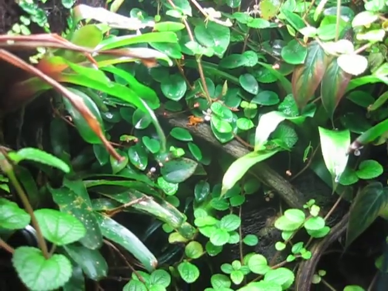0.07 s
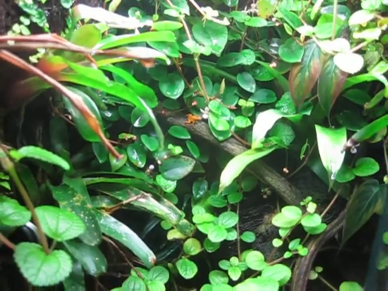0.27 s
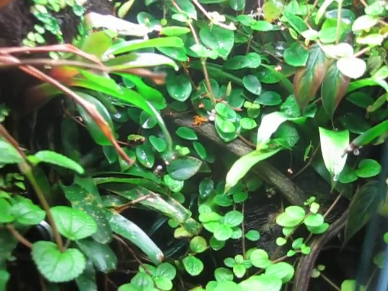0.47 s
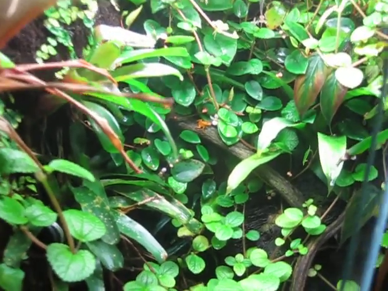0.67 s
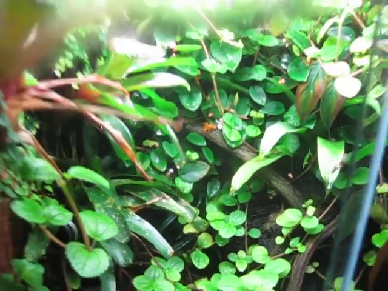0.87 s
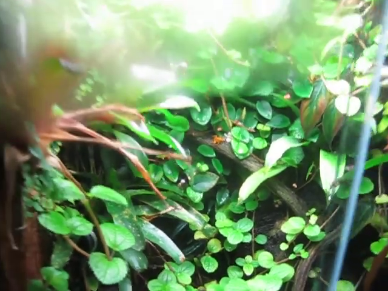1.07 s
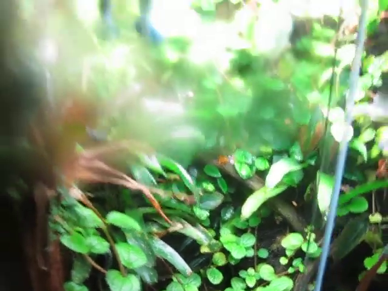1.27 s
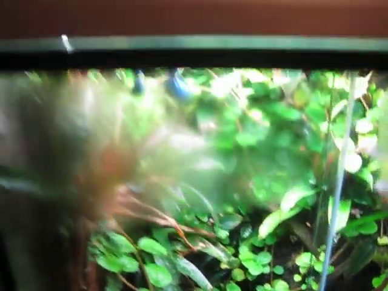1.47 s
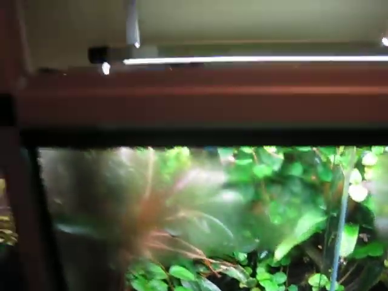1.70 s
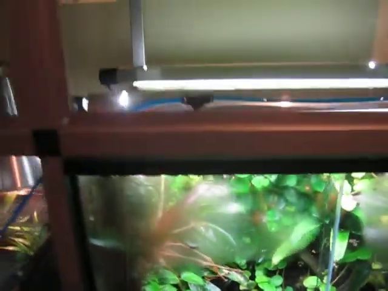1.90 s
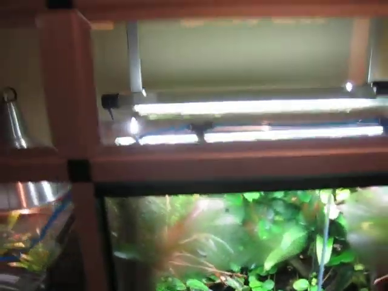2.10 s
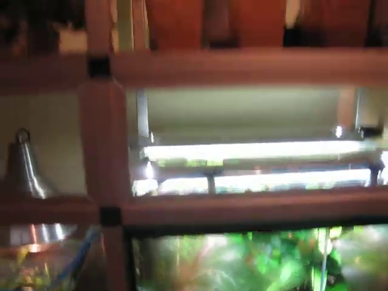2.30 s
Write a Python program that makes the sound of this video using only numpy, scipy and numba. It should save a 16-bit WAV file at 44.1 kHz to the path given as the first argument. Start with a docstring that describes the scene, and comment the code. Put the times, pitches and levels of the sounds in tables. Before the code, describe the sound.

A single sharp plastic snap up close, then quiet fan hum and faint handling.

```python
"""Camera catch snapping shut

A small plastic catch on a hand-held camera is touched, drags and snaps home, right at the microphone.
The gain control ducks, then lets the fan noise, hum and hiss of a terrarium room creep back.
A soft bump, dull nudges, a few ticks and finger rubs follow as the camera is moved."""
import sys
import numpy as np
from scipy import signal
from scipy.fft import rfft, irfft
from scipy.io import wavfile
from numba import njit

SR = 44100
rng = np.random.default_rng(int(sys.argv[2]) if len(sys.argv) > 2 else 0)


def output_pcm(signal):
    """Save a mono or channel-first signal as 16-bit PCM at the path in sys.argv[1].

    Samples are clipped to [-1, 1] before scaling.
    """
    pcm = np.clip(np.atleast_2d(signal).T, -1, 1) * 32767
    wavfile.write(sys.argv[1], SR, np.round(pcm).astype(np.int16))


N = 108045
TIME_S = np.arange(N) / SR
FREQ_HZ = np.fft.rfftfreq(N, 1 / SR)


def undb(db):
    """Decibels to gain."""
    return 10 ** (np.asarray(db) / 20)


def unit_rms(x):
    """Scale to rms 1."""
    return x / np.sqrt(np.mean(x ** 2))


def colour(x, spectrum):
    """Filter x by (freq_hz, level_db) points; rms 1."""
    hz, db = np.array(spectrum).T
    gain = undb(np.interp(np.log(np.maximum(FREQ_HZ, 1)), np.log(hz), db))
    return unit_rms(irfft(rfft(x) * gain, N))


def noise(spectrum):
    """Coloured noise; rms 1."""
    return colour(rng.standard_normal(N), spectrum)


def band(centre_hz, width_hz):
    """Noise in one resonance; rms 1."""
    detuning = 2 * (FREQ_HZ - centre_hz) / width_hz
    return unit_rms(irfft(rfft(rng.standard_normal(N)) / (1 + detuning ** 2), N))


def decay(start_s, t60_s):
    """Sudden onset, exponential decay."""
    age_s = TIME_S - start_s
    return (age_s >= 0) * np.exp(-np.log(1000) * np.maximum(age_s, 0) / t60_s)


def swell(peak_s, half_width_s):
    """Gaussian envelope."""
    return np.exp(-((TIME_S - peak_s) / half_width_s) ** 2)


def ring(start_s, modes):
    """Struck modes; neighbours swing in opposite directions."""
    age_s = TIME_S - start_s
    return sum((-1) ** k * undb(db) * decay(start_s, t60_s) * np.sin(2 * np.pi * hz * age_s)
               for k, (hz, db, t60_s) in enumerate(modes))


# Catch and camera shell modes: pitch_hz, level_db, t60_s
CATCH_MODES = [(4730, -5.5, 0.01), (5160, -7.5, 0.013), (5820, -10.5, 0.01), (7120, -10.5, .006),
               (8770, -6, 0.0056), (9720, -7, .006), (11240, -5, 0.0064), (13550, -2, .006),
               (14360, -3, .005), (15300, -4, .005)]
SHELL_MODES = [(495, -18, .03), (720, -30.5, .055), (940, -23.5, 0.043), (1140, -20.5, .03),
               (1360, -20.5, 0.029), (1566, -7.5, 0.016), (1876, -1, 0.016), (2270, -1, 0.018),
               (2374, -22, 0.056), (2620, -19.5, 0.036), (3030, -7.5, 0.02), (3210, -15, 0.018),
               (4250, -32, .06), (8460, -40.5, .06), (9690, -45.5, .065)]
# Spectra of plastic contact and room reflections: freq_hz, level_db
PLASTIC_SPECTRUM = [(150, -20), (500, -10.5), (1100, 1), (2000, 2), (3200, -1.5), (5500, -4), (8500, -3),
                    (12000, -11), (16000, -10)]
REFLECTION_SPECTRUM = [(200, -10.5), (700, 3.5), (2500, -1), (4000, -3), (5500, -19), (8500, -17),
                       (11000, -28), (16000, -30)]

def snap(start_s, shell_lag_s=0.00019, shell_attack_s=0.0007):
    """The catch cracks home, the shell rings just after, near surfaces answer briefly."""
    catch = undb(2) * ring(start_s, CATCH_MODES)
    crack = undb(-8.5) * decay(start_s, t60_s=0.0095) * noise(PLASTIC_SPECTRUM)
    shell_start_s = start_s + shell_lag_s
    shell_onset = np.clip((TIME_S - shell_start_s) / shell_attack_s, 0, 1)
    shell = undb(3) * shell_onset * ring(shell_start_s, SHELL_MODES)
    reflections = undb(-25) * decay(start_s, t60_s=0.073) * noise(REFLECTION_SPECTRUM)
    return catch + crack + shell + reflections


def drag(start_s, peak_s, end_s, slips_per_s=6000, rise_db=35.5, fall_db=3.5):
    """Stick-slip clicks and smooth friction grow louder as the catch slides towards its edge."""
    slips = unit_rms(rng.standard_normal(N) * (rng.random(N) < slips_per_s / SR))
    friction = 0.67 * rng.standard_normal(N)
    before_peak = np.maximum((peak_s - TIME_S) / (peak_s - start_s), 0)
    after_peak = np.maximum((TIME_S - peak_s) / (end_s - peak_s), 0)
    envelope = undb(-17.5 - rise_db * before_peak - fall_db * after_peak) * (TIME_S < end_s)
    return envelope * colour(slips + friction, PLASTIC_SPECTRUM)


# Modes of the touched catch: pitch_hz, level_db, t60_s
TOUCH_MODES = [(1384, -3.5, .012), (1800, 0.5, 0.0062), (2220, 1, 0.01), (3590, -2, 0.064),
               (4200, -9.5, .02), (4980, -9.5, .016), (10500, -10.5, .003)]

def touch(start_s):
    """First contact rings the catch lightly."""
    return undb(-24) * ring(start_s, TOUCH_MODES)


# Camera body modes: pitch_hz, level_db, t60_s
BUMP_MODES = [(150.5, 2.5, 0.075), (223, 0, 0.077), (314.5, -0.5, 0.098), (1350, 0, 0.024),
              (2860, -13, 0.031)]

def bump(start_s):
    """A soft bump of the hand rings the camera body."""
    return undb(-34) * ring(start_s, BUMP_MODES)


# Hand nudges: start_s, level_db
NUDGES = [(0.566, -45.5), (0.878, -46.5), (0.929, -47.5), (1.465, -47), (1.791, -45.5), (2.342, -48)]
# Thud spectrum: freq_hz, level_db
NUDGE_SPECTRUM = [(100, -4), (450, -11), (730, 4), (1100, -9.5), (1700, -19.5), (4000, -30), (12000, -47)]

def nudges():
    """The hand thuds dully on the camera body."""
    thud = noise(NUDGE_SPECTRUM)
    return sum(undb(db) * decay(start_s, t60_s=0.11) * thud for start_s, db in NUDGES)


# Finger ticks: peak_s, level_db, low_hz, high_hz, high_re_low_db
TICKS = [(0.9802, -52.5, 6440, 8870, 6), (1.7006, -41.5, 4500, 9900, -.5), (2.048, -50.5, 4800, 8150, -2.5)]
# Finger rubs: peak_s, half_width_s, level_db
RUBS = [(1.68, 0.032, -57.5), (1.863, .016, -48.5), (1.969, 0.019, -52.5)]
# Skin friction spectrum: freq_hz, level_db
SKIN_SPECTRUM = [(600, -10), (2200, 3), (4500, -4.5), (6000, -11), (10000, -14), (16000, -18)]

def fingers(tick_width_hz=1640):
    """Fingers on the camera make short bright ticks and softer rubs."""
    skin = noise(SKIN_SPECTRUM)
    out = np.zeros(N)
    for peak_s, db, low_hz, high_hz, high_db in TICKS:
        resonances = band(low_hz, tick_width_hz) + undb(high_db) * band(high_hz, tick_width_hz)
        out += undb(db) * swell(peak_s, half_width_s=0.0012) * (resonances + undb(-1) * skin)
    for peak_s, half_width_s, db in RUBS:
        out += undb(db) * swell(peak_s, half_width_s) * skin
    return out


# Airflow spectrum: freq_hz, level_db
AIR_SPECTRUM = [(20, -3.5), (52, 0.5), (120, -1.5), (240, -2), (460, -6), (650, -6), (1000, -10),
                (1700, -11.5), (3000, -21), (5000, -27), (8000, -35), (16000, -44.5)]
# Fan resonances: centre_hz, width_hz, level_db
FAN_RESONANCES = [(227, 25, -64), (720.4, 60, -64.5), (1500, 110, -63), (3096, 250, -70.5)]

def fan(flutter_db=0.1):
    """Moving air with a few resonances; the level flutters slightly."""
    air = undb(-50.5) * noise(AIR_SPECTRUM)
    resonances = sum(undb(db) * band(hz, width_hz) for hz, width_hz, db in FAN_RESONANCES)
    return (air + resonances) * undb(flutter_db * band(0, width_hz=25))


# Hum lines: pitch_hz, rms_db
HUM_LINES = [(53.8, -64.5), (393, -70)]

def hum():
    """Faint steady tones at random phases."""
    return sum(undb(db) * np.sqrt(2) * np.sin(2 * np.pi * (hz * TIME_S + rng.random()))
               for hz, db in HUM_LINES)


# Hiss spectrum: freq_hz, level_db
HISS_SPECTRUM = [(1500, -3.5), (4400, 1.5), (7500, -1), (10000, -1), (12200, 1.5), (13100, -4.5),
                 (14000, -2), (15000, 5.5), (15800, 1), (16100, -16)]
# Hiss envelope: time_s, gain_db
HISS_ENVELOPE = [(0, 0), (.7, 0.5), (1.3, 0.6), (1.66, 3), (1.8, 0.5), (2.45, -0.5)]

def hiss():
    """Smooth treble noise that swells once."""
    gain_db = np.interp(TIME_S, *np.array(HISS_ENVELOPE).T)
    return undb(-62.5 + gain_db) * noise(HISS_SPECTRUM)


def scene():
    """Catch, handling and room tone at one microphone."""
    snap_s = 0.2099
    catch = touch(start_s=0.1877) + drag(start_s=0.1972, peak_s=0.2058, end_s=snap_s) + snap(snap_s)
    handling = bump(start_s=0.6455) + nudges() + fingers()
    return (catch + handling + fan() + hum() + hiss())[None]


@njit
def gain_control(excess_db, attack_s, hold_s, release_s):
    """Gain reduction in dB: rises fast, holds, lets go slowly."""
    out = np.zeros(len(excess_db))
    duck_db, hold_samples = 0., 0.
    for i in range(len(excess_db)):
        if excess_db[i] > duck_db:
            duck_db += (excess_db[i] - duck_db) / (attack_s * SR)
            hold_samples = hold_s * SR
        elif hold_samples > 0:
            hold_samples -= 1
        else:
            duck_db -= duck_db / (release_s * SR)
        out[i] = duck_db
    return out


def record(dry, threshold_db=-9.5, ceiling=0.78, cutoff_hz=16200):
    """Gain control ducks on the snap, the peak overloads, a low-pass cuts the top."""
    mic = dry[0]
    excess_db = np.maximum(20 * np.log10(np.abs(mic) + 1e-9) - threshold_db, 0)
    duck_db = gain_control(excess_db, attack_s=0.0005, hold_s=0.11, release_s=0.42)
    clipped = ceiling * np.tanh(mic * undb(-duck_db) / ceiling)
    lowpass = signal.ellip(10, 0.2, 80, cutoff_hz, fs=SR, output="sos")
    return signal.sosfilt(lowpass, clipped)[None]


dry = scene()
out = record(dry)
output_pcm(out)
```